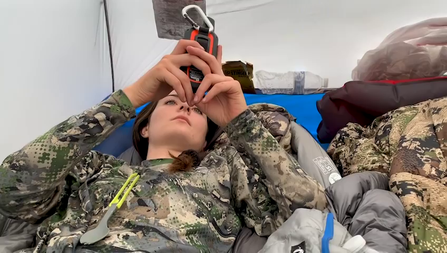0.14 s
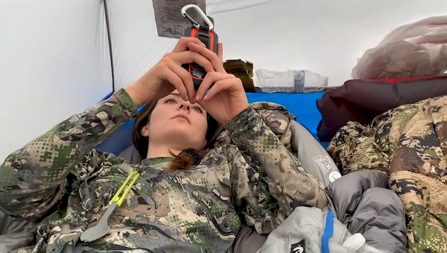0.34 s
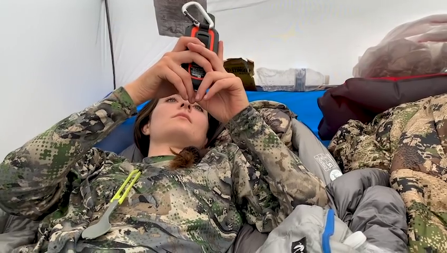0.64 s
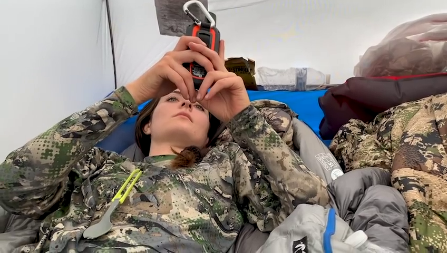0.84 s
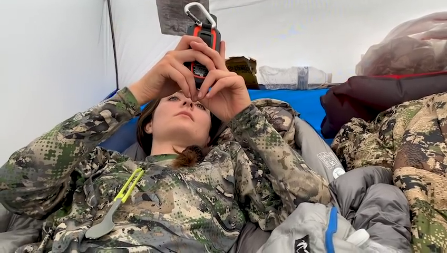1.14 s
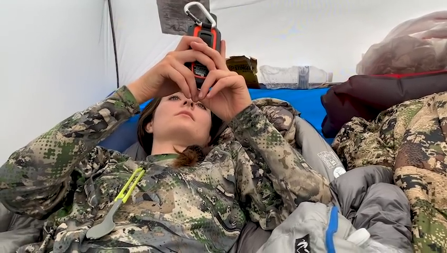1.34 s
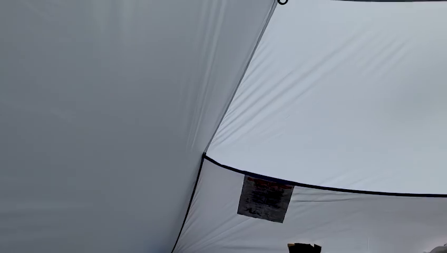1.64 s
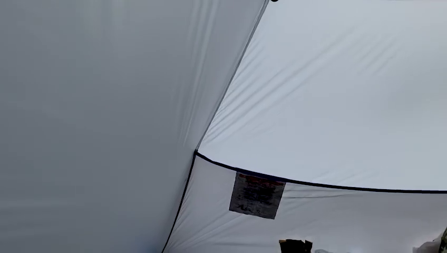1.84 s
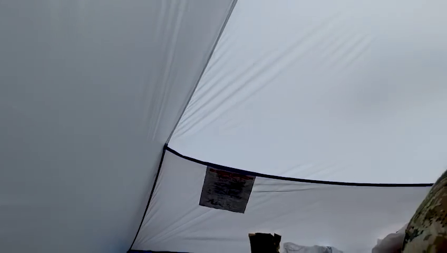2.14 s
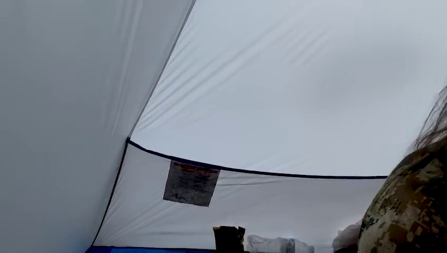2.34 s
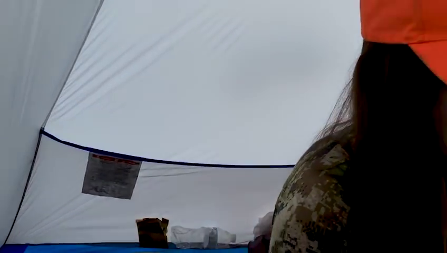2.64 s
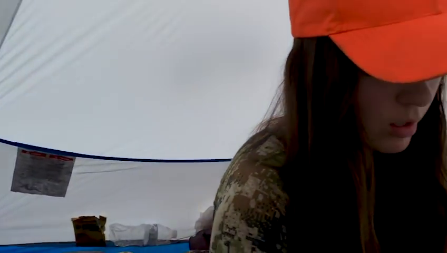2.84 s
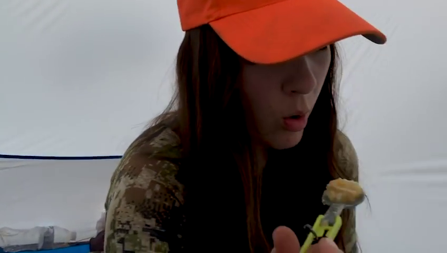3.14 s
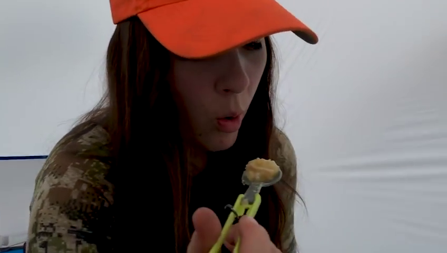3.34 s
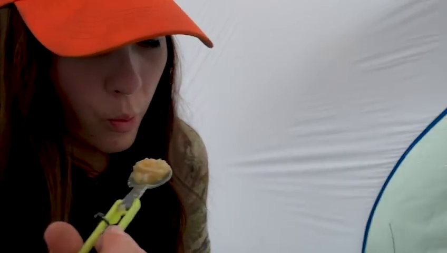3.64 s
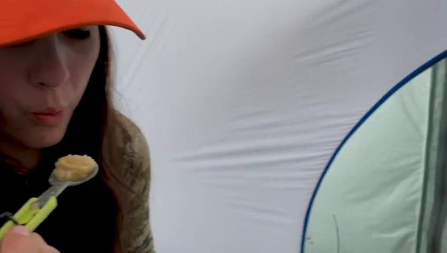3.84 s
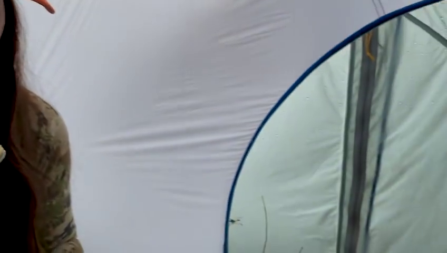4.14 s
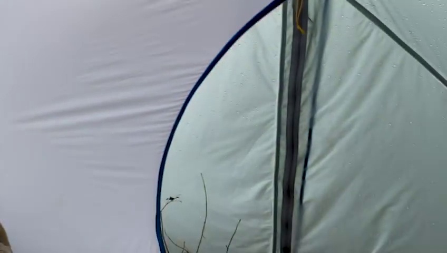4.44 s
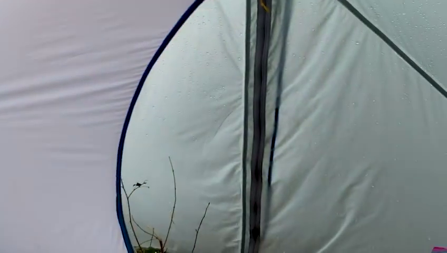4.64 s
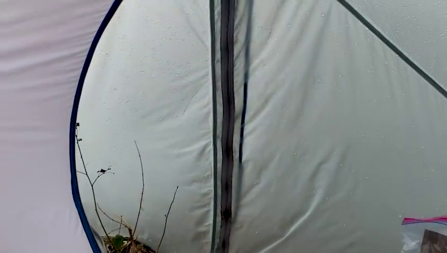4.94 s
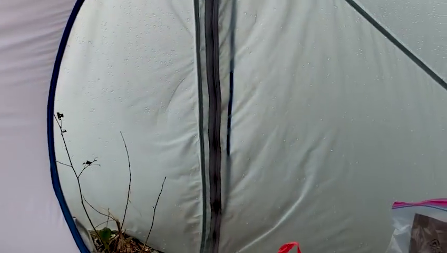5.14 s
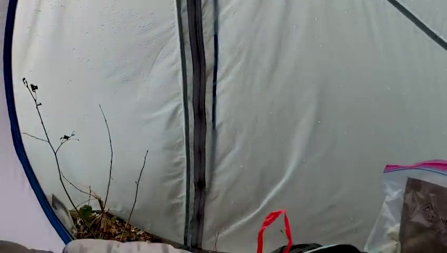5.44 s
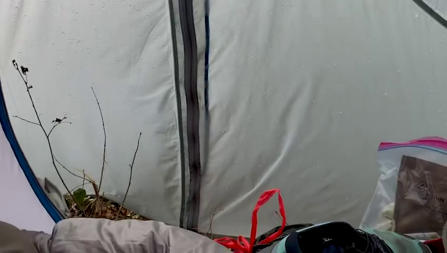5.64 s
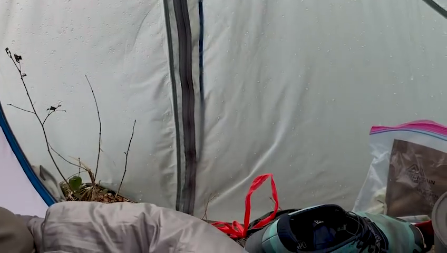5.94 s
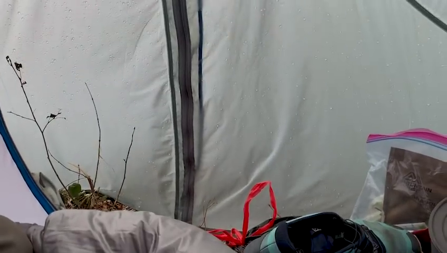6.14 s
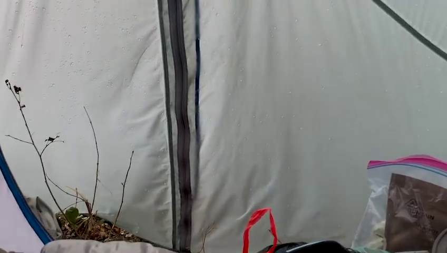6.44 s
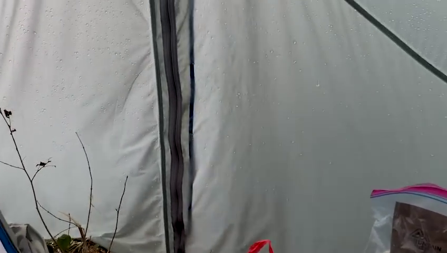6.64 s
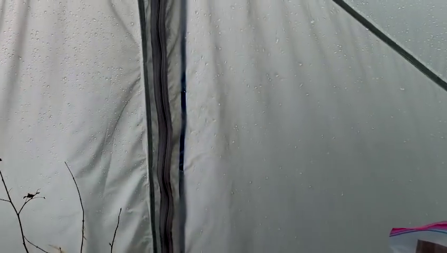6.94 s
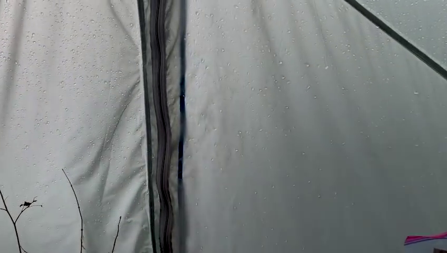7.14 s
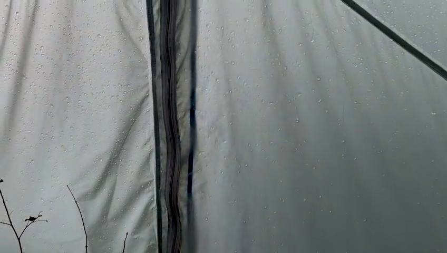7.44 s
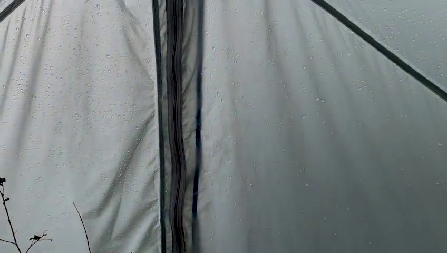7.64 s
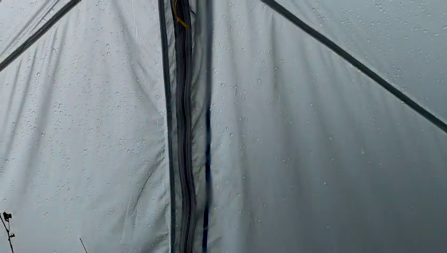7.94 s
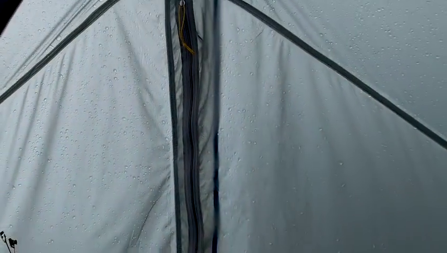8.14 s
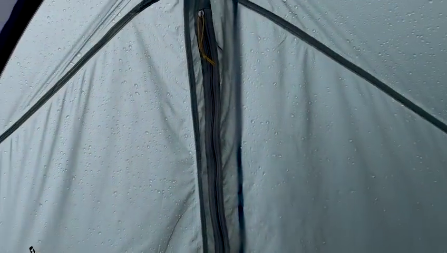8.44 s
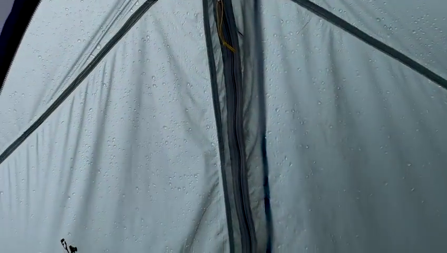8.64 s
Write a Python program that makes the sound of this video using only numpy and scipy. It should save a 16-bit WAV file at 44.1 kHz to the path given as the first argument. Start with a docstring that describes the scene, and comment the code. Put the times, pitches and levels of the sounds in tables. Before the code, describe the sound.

Inside a quiet tent, a small button clicks down and up twice; suddenly a dense downpour patters and hisses on the taut fabric overhead.

```python
"""Downpour on a tent

In near silence, over a faint rumble, a button on a handheld device is pressed and let go twice: snap noise
excites damped modes of its casing, its shell and the hollow between the hands. Then, all at once, heavy rain
drums on the fly, easing and surging with the gusts. Each drop is a short falling chirp of taut fabric with a
noise splash (dispersion of ripples); fine spray hisses between the drops, and volleys, big drops and bright
spatters stand out."""
import sys
import numpy as np
from scipy import signal
from scipy.fft import rfft, irfft
from scipy.io import wavfile
from scipy.ndimage import uniform_filter1d

SR = 44100
rng = np.random.default_rng(int(sys.argv[2]) if len(sys.argv) > 2 else 0)


def store_wav(level_fs):
    """Save 16-bit WAV to argv[1]."""
    pcm = np.round(np.clip(np.atleast_2d(level_fs), -1, 1) * 32767)
    wavfile.write(sys.argv[1], SR, pcm.T.astype(np.int16))


N = 388080
RAIN_START_S = 1.645


def amp(db):
    """Level law: decibels to amplitude ratio."""
    return 10 ** (np.asarray(db) / 20)


def evened(x):
    """Normalization by effective value: scales to rms 1."""
    return x / np.sqrt(np.mean(x ** 2) + 1e-20)


def read(points, hz):
    """Logarithmic pitch scale: interpolates a spectrum over log frequency."""
    f, value = np.transpose(points)
    return np.interp(np.log(hz + 1), np.log(f + 1), value)


def follow(curve, s):
    """Envelope: linear interpolation of a curve at the times s."""
    return np.interp(s, *np.transpose(curve))


def smoothed_noise(shape, first, second):
    """Slow random variation: noise averaged by two (size, axis) windows, at rms 1."""
    noise = rng.standard_normal(shape)
    for size, axis in (first, second):
        noise = uniform_filter1d(noise, size=size, axis=axis)
    return evened(noise)


def scatter(s, sounds):
    """Superposition: sums sounds (channels, events, samples) that start at the times s."""
    at = np.round(s * SR).astype(int)[:, None] + np.arange(sounds.shape[-1])
    return np.array([np.bincount(at.ravel(), side.ravel(), N)[:N] for side in sounds])


def whitened(x):
    """Spectral whitening: (Hz, s, short-time spectra) with a flat long-term spectrum."""
    hz, s, z = signal.stft(x, SR, nperseg=1024, noverlap=768)
    power = np.mean(abs(z) ** 2, axis=(0, 2))
    return hz[:, None], s, z / np.sqrt(power + 1e-20)[:, None]


def waveform(z):
    """Overlap-add synthesis: short-time spectra back to a waveform."""
    return signal.istft(z, nperseg=1024, noverlap=768)[1][:, :N]


CALM_DB = -65.5  # rms level
# spectrum of the air in the tent: frequency_hz, relative_level_db
CALM_SPECTRUM = [(25, -1), (50, -6.5), (125, -5.5), (190, -14), (320, -20), (500, -23), (800, -30),
                 (1300, -31.5), (2000, -39.5), (5000, -45), (9000, -44), (15000, -87)]
# swell of the rumble, strongest at low frequencies: time_s, level_change_db
RUMBLE_SWELL = [(0, 0), (.26, 3), (.4, -1), (.52, -3), (.65, -2), (.9, 1), (1.13, -1), (1.38, -1),
                (1.47, 3.5), (1.6, -1)]


def calm(flutter_db=1.2, side_db=-9):
    """Filtered turbulence noise: light air stirs the tent, a faint, lumpy rumble."""
    common, side = rng.standard_normal((2, N))
    hz, s, z = whitened(common + amp(side_db) * np.array([side, -side]))
    lumps = evened(uniform_filter1d(rng.standard_normal(len(s)), size=14))
    swell_db = follow(RUMBLE_SWELL, s) + flutter_db * lumps
    colour_db = read(CALM_SPECTRUM, hz) + swell_db / (1 + hz / 400)
    return amp(CALM_DB) * evened(waveform(z * amp(colour_db)))


def tent(x, t60, wet_db, count=3):
    """Sparse reverberation: reflections between the fabric walls, along paths that keep changing."""
    t = np.arange(3072) / SR
    turn = 2 * np.pi * 3.7 * np.arange(N) / SR  # the paths change at 3.7 Hz
    wet = 0
    for k in range(count):
        bounces = rng.standard_normal((2, len(t))) * (rng.random((2, len(t))) < .1) * (t > .002)
        tail = evened(bounces * amp(-60 * t / t60)) / np.sqrt(len(t))
        share = np.sqrt(2 / count) * np.cos(turn + np.pi * k / count)
        wet = wet + signal.oaconvolve(x * share, tail, axes=1)[:, :N]
    return x + amp(wet_db) * wet


# clicks, down and up: start_s, relative_level_db, ring of the hollow between the hands hollow_hz, # ring of the
# shell shell_hz, top of the band top_hz, delay of the end stop stop_s
BUTTON_CLICKS = [(0.2313, -44, 2150, 7550, 8700, .003), (0.3605, -43.5, 2100, 7700, 8500, .0028),
                 (1.1912, -46, 1720, 6100, 7500, .0042), (1.3130, -43, 1750, 6600, 7400, .0045)]
# modes of the button's casing: frequency_hz, relative_level_db, t60_s
CASING_MODES = [(2200, -9, .028), (2650, -12, .022), (4900, -16, .025), (5980, -10, .028),
                (6760, -10, .028), (7300, -9, .024)]


def button(level_db=-11, snap_db=1.5, snap_s=0.005, hollow_db=-3, hollow_t60=0.015,
           shell_db=-1, shell_t60=.012, stop_db=-3, swell_s=.0005):
    """Modal excitation: snap, then end stop, ring the casing, its shell and the hollow between the hands."""
    t = np.arange(3000) / SR
    clicks = 0
    for s, peak_db, hollow_hz, shell_hz, top_hz, stop_s in BUTTON_CLICKS:
        modes = list(CASING_MODES)
        modes += [(hollow_hz, hollow_db, hollow_t60), (shell_hz, shell_db, shell_t60)]
        # axes: direct or glancing path, snap or end stop, samples
        ring = 0
        for hz, db, t60 in modes:
            phase = rng.random((2, 2, 1))
            ring = ring + amp(db - 60 * t / t60) * np.sin(2 * np.pi * (hz * t + phase))
        snap = amp(snap_db) * rng.standard_normal((2, 2, len(t))) * np.exp(-t / snap_s)
        padded = (ring + snap) * (1 - np.exp(-t / swell_s))  # the fingertip softens the attack
        band = signal.butter(6, [700, top_hz], "band", fs=SR, output="sos")
        gain = amp(level_db + peak_db + np.array([[0], [stop_db]]))
        direct, glancing = signal.sosfilt(band, padded) * gain
        # straight ahead: much alike on both sides
        both = np.array([direct, (direct + glancing) / np.sqrt(2)])
        clicks = clicks + scatter(np.array([s, s + stop_s]), both)
    return tent(clicks, t60=.13, wet_db=-7)


# strength of the shower, which builds, sinks to a lull, then surges: time_s, relative_level_db
SHOWER_STRENGTH = [(1.65, -33), (1.95, -34), (2.2, -30.8), (2.62, -33.3), (3.55, -29.7), (3.95, -26.7),
                   (4.4, -28.8), (4.85, -31.5), (5.05, -37.4), (5.4, -40), (5.74, -42.8), (5.86, -34.5),
                   (6.0, -36.3), (6.255, -37), (6.285, -43.5), (6.6, -43.8), (6.68, -29.5), (6.8, -28.3),
                   (6.98, -31.8), (7.245, -22.8), (7.42, -24), (7.7, -32), (8.12, -25.8), (8.8, -28.2)]


def arrivals(per_s, crowding, clumping_db):
    """Inhomogeneous Poisson process: more landings in a gust, and in little volleys."""
    s = np.arange(N) / SR
    strength_db = follow(SHOWER_STRENGTH, s)
    clumps = smoothed_noise(N, (700, 0), (300, 0))
    rate = per_s * amp(crowding * (strength_db - strength_db.mean()) + clumping_db * clumps)
    return s[(rng.random(N) < rate / SR) & (s > RAIN_START_S)]


# most drops are heard from the roof, nearly half from the near wall, on the left
WALL_SHARE = .47
# lead of the left microphone, mean and spread (s)
WALL_LEAD_S, WALL_SPREAD_S = .00041, .00006
ROOF_LEAD_S, ROOF_SPREAD_S = .00006, .00016


def bearings(count):
    """Interaural delay: drops on wall or roof, as the lead of the left microphone."""
    on_wall, spread = rng.random(count) < WALL_SHARE, rng.standard_normal(count)
    wall_lead_s = WALL_LEAD_S + WALL_SPREAD_S * spread
    roof_lead_s = ROOF_LEAD_S + ROOF_SPREAD_S * spread
    return np.where(on_wall, wall_lead_s, roof_lead_s)


def drop_sounds(pitch_hz, lead_s, swell_s, splash_db, splash_s, bend_s=0.00044):
    """Dispersion: on wet fabric short waves arrive first, so each tap falls in pitch in milliseconds."""
    phase, wet = rng.random((len(pitch_hz), 2)).T[:, :, None]
    # path difference to the two microphones
    lead = lead_s[:, None] * np.array([.5, -.5])[:, None, None]
    t = np.maximum(np.arange(448) / SR - .0003 + lead, 0).astype(np.float32)
    pitch_hz = pitch_hz[:, None]
    swell = swell_s * np.sqrt(1000 / pitch_hz)  # low taps push more slowly
    # the falling pitch passes pitch_hz at its loudest
    turns = pitch_hz * (bend_s + swell) * np.log1p(t / bend_s)
    envelope = t / swell * np.exp(1 - t / swell)
    ripple = envelope * np.sin(2 * np.pi * (turns + phase))
    splash = rng.standard_normal(t.shape, np.float32) * (t > 0) * np.exp(-t / splash_s)
    return ripple + amp(splash_db) * 2 * wet * splash


def landed(s, drops, echo_db):
    """Single reflection: each drop returns once from a pole or seam, a few milliseconds later."""
    delay_s = rng.uniform(.0015, .006, len(s))
    return scatter(s, drops) + amp(echo_db) * scatter(s + delay_s, drops)


def taps():
    """Size-pitch scaling: drops of all sizes on the fly, the larger ones lower and louder."""
    s = arrivals(per_s=1050, crowding=.88, clumping_db=.35)
    size_db = 5 * np.minimum(rng.exponential(1, len(s)), 2.4)
    octaves = rng.uniform(-1.63, 1.148, len(s)) - size_db / 36
    pitch_hz = 1350 * 2 ** octaves
    drops = drop_sounds(pitch_hz, bearings(len(s)), swell_s=0.000696, splash_db=-8.0, splash_s=0.0026)
    return tent(landed(s, drops * amp(size_db)[:, None], echo_db=-5), t60=.05, wet_db=-11)


def spray(per_s=1400, fizz_s=0.0055, size_db=4.8):
    """Shot noise: droplets burst into fine spray, each a brief fizz, on either side."""
    size = amp(size_db * np.minimum(rng.exponential(1, (2, N)), 4.5))
    bursts = size ** 2 * (rng.random((2, N)) < per_s / SR)
    # fizz_s is the decay time of power
    power = signal.lfilter([1], [1, -np.exp(-1 / (fizz_s * SR))], bursts)
    return np.sqrt(power) * rng.standard_normal((2, N))


# spectrum of rain on the fly: frequency_hz, relative_level_db
FLY_SPECTRUM = [(25, -26), (55, -4.5), (90, -3.5), (160, -6.3), (300, 0.3), (410, -0.1), (520, -2.5),
                (720, -1.5), (1300, -2.5), (2000, -6), (3100, -9.8), (4400, -10.1), (5800, -16.2),
                (8300, -16.8), (11000, -22.3), (15500, -31)]
# left-right balance, positive to the left: frequency_hz, difference_db
LEFT_LEAN = [(100, -1.5), (380, 0), (750, 5.5), (1300, 1), (2400, .5), (4300, -0.5), (5700, -3),
             (7500, -5.5)]
# fine spray against the taps: frequency_hz, relative_level_db
SPRAY_BALANCE = [(100, 2), (350, -9), (1500, -12), (4200, -1.5), (12000, -1.5)]
# level of the middle band, around 1-3 kHz: time_s, level_change_db
MIDDLE_LEVEL = [(1.65, 2.0), (2.7, 2), (3.8, 0.9), (4.6, 1), (6.5, 0), (7.35, 1.2), (8.1, 0.5), (8.8, 0.4)]
# level of the top treble: time_s, level_change_db
TOP_LEVEL = [(1.65, -3.5), (2.4, -1), (6.4, -1.5), (7.2, 1.6)]
# level of the drumming, around 300-900 Hz: time_s, level_change_db
DRUMMING_LEVEL = [(1.65, 0.2), (3.35, 0.5), (3.9, 1.1), (4.6, -.3), (7.3, -0.5), (8.1, 1.5), (8.8, -0.8)]
# level of the bass: time_s, level_change_db
BASS_LEVEL = [(1.65, -1.5), (3.6, -2), (4.0, 0), (5.2, 1.5), (5.9, -3.5), (6.4, 2), (7.0, -1.5), (7.4, 0),
              (8.8, 0.5)]
THUD_PER_DB = 0.11  # harder rain has heavier drops: more thud (dB for each dB of strength)


def rain(level_db=-0.6, mono_hz=300, steady_bass=0.5):
    """Source-filter principle: taps and spray take the colour of the fly and follow the gusts."""
    t = np.arange(N) / SR
    landing = t > RAIN_START_S
    patter = taps()
    power = uniform_filter1d(np.mean(patter ** 2, 0), size=5000)
    # even, so that the gusts set the loudness
    patter = patter / np.sqrt(abs(power) + 0.0088 * power.mean())
    hz, s, z = whitened(patter)
    z = z + amp(read(SPRAY_BALANCE, hz)) * whitened(spray() * landing)[2]

    # long waves reach both microphones alike
    apart = hz / np.hypot(hz, mono_hz)
    middle_z = z.mean(0)
    z = whitened(waveform(middle_z + apart * (z - middle_z)))[2]

    # the strength of the shower sets the weight of the thuds
    strength_db = follow(SHOWER_STRENGTH, s)
    gust_db = strength_db - strength_db.mean()
    thud = read([(200, .4), (350, 1), (750, 1), (1200, 0)], hz)
    colour_db = read(FLY_SPECTRUM, hz) + THUD_PER_DB * thud * gust_db

    # the colour drifts slowly in four bands
    middle = read([(500, 0), (1200, 1), (2600, 1), (4500, 0)], hz)
    top = read([(5000, 0), (11000, 1)], hz)
    bass = read([(120, 1), (250, 0)], hz)
    colour_db = colour_db + middle * follow(MIDDLE_LEVEL, s) + top * follow(TOP_LEVEL, s)
    colour_db = colour_db + thud * follow(DRUMMING_LEVEL, s) + bass * follow(BASS_LEVEL, s)

    # the deepest rumble swells less than the patter
    colour_db = colour_db - steady_bass * read([(70, 1), (200, 0.27)], hz) * gust_db
    # the wet panels sag and tighten, so their resonances wander
    panels = smoothed_noise(colour_db.shape, (7, 0), (14, 1))
    colour_db = colour_db + panels * read([(150, .3), (600, 1.0), (2500, 1.6), (9000, 1.4)], hz)

    lean_db = np.array([.5, -.5])[:, None, None] * read(LEFT_LEAN, hz)
    sound = evened(waveform(z * amp(colour_db + lean_db)))
    return sound * landing * amp(level_db + follow(SHOWER_STRENGTH, t))


# heavy drops that land together: centre_s, relative_level_db of each drop, central pitch_hz, length_s
DROP_VOLLEYS = [(1.68, -31, 900, .04), (1.9, -31, 1150, .04), (2.215, -29, 1160, .03),
                (2.764, -29, 1030, .025), (3.165, -30, 1080, .02), (3.838, -24, 950, .035),
                (3.975, -26, 800, .04), (4.24, -29, 900, .04), (4.42, -28, 950, .03),
                (4.666, -26.5, 1030, .03), (4.866, -29, 1030, .04), (5.892, -30, 850, .025),
                (6.73, -25.5, 900, .035), (6.83, -28, 1000, .03), (7.15, -26, 1000, .025),
                (7.275, -20, 800, .06), (7.35, -24, 1100, .025), (7.418, -20.5, 700, .055),
                (7.463, -26, 950, .025), (7.546, -26.5, 930, .025), (7.807, -27, 1000, .03),
                (8.56, -29, 1000, .04)]


def volleys(level_db=-1.7, left_db=3, count=10):
    """Clustered impacts: a gust flings a handful of heavy drops at the fly, a short, firm drum roll."""
    s, peak_db, pitch_hz, length_s = np.repeat(DROP_VOLLEYS, count, axis=0).T
    when, size, tone = rng.uniform(-1, 1, (len(s), 3)).T
    drops = drop_sounds(pitch_hz * 2 ** (.7 * tone), bearings(len(s)),
                        swell_s=.0008, splash_db=-14, splash_s=.003)
    side_db = np.array([[.5], [-.5]]) * left_db
    gain = amp(level_db + peak_db - 1 + 4 * size + side_db)
    rolls = landed(s + when * length_s / 2, drops * gain[:, :, None], echo_db=-6)
    return tent(rolls, t60=.05, wet_db=-11)


# the largest drops, right overhead, and a low flap of the fabric at 6.38 s: start_s, relative_level_db, #
# pitch_hz of the slap, left-right difference_db (positive to the left)
OVERHEAD_DROPS = [(1.669, -22, 960, 3), (1.75, -21, 1100, 4), (1.759, -18.5, 1520, 1),
                  (1.836, -23, 1030, 4), (1.908, -21, 1100, 2), (1.994, -21, 740, 0), (2.007, -22, 1280, 1),
                  (2.111, -17.5, 900, -1), (2.125, -21, 1020, 2), (2.385, -18.5, 1350, -1),
                  (2.496, -19, 1200, 0), (2.702, -14.5, 1250, 1), (2.823, -15.5, 1500, 4),
                  (2.897, -17.5, 950, 3), (2.916, -20, 1150, 2), (2.989, -21.5, 1150, -2),
                  (3.045, -21, 970, 3), (3.195, -13, 1550, -1), (3.302, -18.5, 790, 2),
                  (3.359, -20, 950, 3), (3.437, -19, 1150, 2), (3.473, -15, 830, 0), (3.562, -19, 860, 3),
                  (3.65, -17.5, 720, 4), (3.722, -18, 820, 5), (3.799, -17, 780, 6), (3.833, -15.5, 900, 4),
                  (3.958, -14.5, 900, 3), (4.051, -17, 880, 6), (4.089, -18, 860, 7), (4.13, -17, 1000, 3),
                  (4.236, -18.5, 930, 1), (4.369, -19, 910, 5), (4.496, -19, 1000, 2),
                  (4.623, -19, 1130, 3), (4.661, -18, 950, 4), (4.85, -18, 820, 2), (4.915, -19, 620, 2),
                  (5.022, -22, 1400, 4), (5.065, -25, 1250, 1), (5.164, -20, 1450, 2),
                  (5.186, -19.5, 720, 3), (5.262, -18.5, 1300, 2), (5.267, -25, 1190, -2),
                  (5.338, -24, 1550, 0), (5.355, -23.5, 1200, 1), (5.45, -27.5, 830, -2),
                  (5.511, -28, 950, 1), (5.543, -22, 1150, 0), (5.617, -23.5, 690, 5),
                  (5.686, -23.5, 1550, -1), (5.711, -28, 1170, 2), (5.797, -26.5, 950, 3),
                  (5.817, -25, 760, 5), (5.882, -14.5, 750, 5), (5.918, -23, 800, 3), (6.105, -23, 1240, 2),
                  (6.15, -25, 1440, 0), (6.198, -21, 1200, 1), (6.225, -16, 1100, 2), (6.244, -19, 1200, 1),
                  (6.254, -21, 900, 2), (6.263, -23, 1000, -1), (6.319, -23.5, 1340, 0),
                  (6.351, -28.5, 1400, -3), (6.369, -29, 1120, 3), (6.379, -33, 200, 0),
                  (6.412, -30, 900, 6), (6.423, -29, 960, 4), (6.448, -28, 1550, 3), (6.474, -31, 870, 4),
                  (6.537, -26.5, 1400, -1), (6.556, -25.5, 1230, 3), (6.642, -22, 720, 4),
                  (6.681, -18, 1100, 6), (6.689, -19, 800, 3), (6.837, -20, 1200, 0), (6.903, -20, 730, 4),
                  (6.959, -15.5, 1200, 2), (7.08, -17.5, 630, 1), (7.149, -16, 1000, 4),
                  (7.26, -12.5, 940, 6), (7.271, -13, 900, 3), (7.294, -9, 850, 3), (7.34, -10.5, 1400, 2),
                  (7.544, -17.5, 890, 3), (7.688, -20.5, 720, 3), (7.76, -15.5, 680, 2),
                  (7.893, -19, 830, 5), (7.957, -16.5, 620, 3), (8.107, -15, 820, 4), (8.134, -15, 860, 5),
                  (8.192, -15.5, 730, 4), (8.245, -16, 650, 1), (8.319, -17, 1160, 0), (8.379, -14, 730, 2),
                  (8.417, -17, 730, 2), (8.569, -16, 1050, 2), (8.769, -18, 1000, 4)]
# ripples of a fat drop, tick, slap and thud: pitch_multiple, relative_level_db, swell_s at 1000 Hz
DROP_RIPPLES = [(2.7, -9, .0005), (1, -1.5, .0008), (.55, -12, .0008)]
LEAD_S_PER_DB = .00007  # a drop louder on the left also arrives earlier there (s for each dB)


def big_drops(level_db=-2.4, top_hz=11000):
    """Superposed ripples: fat drops stand out of the patter, each a sharp tick, a slap and a thud."""
    s, peak_db, pitch_hz, left_db = np.transpose(OVERHEAD_DROPS)
    drops = 0
    for multiple, db, swell_s in DROP_RIPPLES:
        ripple = drop_sounds(pitch_hz * multiple, LEAD_S_PER_DB * left_db, swell_s,
                             splash_db=-14.5, splash_s=.0035, bend_s=.0004)
        drops = drops + amp(db) * ripple
    # the fabric dulls the splash
    drops = signal.sosfilt(signal.butter(3, top_hz, fs=SR, output="sos"), drops)
    gain = amp(level_db + peak_db + np.array([[.5], [-.5]]) * left_db)
    return tent(landed(s, drops * gain[:, :, None], echo_db=-9), t60=0.045, wet_db=-13)


# drips that shatter: start_s, relative_level_db, decay_s
SHATTERED_DRIPS = [(1.907, -25, .005), (2.821, -18.5, .006), (3.194, -22, .005), (4.659, -24, .008),
                   (5.072, -30, .01), (5.1408, -31, .008), (5.163, -27, .007), (5.185, -28, .005),
                   (5.26, -29, .008), (5.341, -30, .01), (5.507, -33, .01), (5.542, -33, .008),
                   (5.679, -35, .014), (5.8422, -30, .012), (5.882, -30, .012), (5.933, -28, .007),
                   (6.08, -31, .012), (6.2238, -30, .007), (6.243, -31, .01), (6.252, -29, .012),
                   (6.3106, -31, .012), (6.35, -36, .008), (6.42, -38, .01), (6.4473, -26.5, .011),
                   (6.532, -37, .008), (6.555, -32, .006), (6.623, -35, .02), (6.641, -30, .008),
                   (6.957, -23, .007), (7.038, -26, .004), (7.262, -21, .012), (7.339, -19, .008),
                   (7.393, -21, .012)]


def spatters(level_db=-8.3):
    """Decaying band noise: a shattered drip showers the fly with droplets, a short, bright fizz."""
    s, peak_db, fizz_s = np.transpose(SHATTERED_DRIPS)
    t = np.arange(2500) / SR
    fizz = rng.standard_normal((2, len(s), len(t))) * np.exp(-t / fizz_s[:, None])
    band = signal.butter(2, [1800, 11000], "band", fs=SR, output="sos")
    return scatter(s, signal.sosfilt(band, fizz) * amp(level_db + peak_db)[:, None])


def scene():
    """Linear superposition: the quiet tent, the button and the downpour."""
    return calm() + button() + rain() + volleys() + big_drops() + spatters()


TREBLE_SHARED = .8  # share of the right channel's top treble in the left
EDGE_HZ = 15800  # upper band limit


def record(dry, merge_hz=6700, lag_s=0.0001431):
    """Interchannel coherence: once the rain begins, the treble above about 6.7 kHz is largely shared by both
    sides, later on the left; band limit."""
    hz = np.fft.rfftfreq(N, 1 / SR)
    left, right = rfft(dry)
    same = TREBLE_SHARED / (1 + (merge_hz / (hz + 1)) ** 20)
    delayed = right * np.exp(-2j * np.pi * hz * lag_s)
    left = np.sqrt(1 - same ** 2) * left + same * delayed
    merged = irfft(np.array([left, right]), N)
    stereo = np.where(np.arange(N) / SR > RAIN_START_S, merged, dry)
    low_pass = signal.firwin(511, EDGE_HZ, window=("kaiser", 9), fs=SR)
    return signal.oaconvolve(stereo, low_pass[None], "same")


dry = scene()
out = record(dry)
store_wav(out)
```